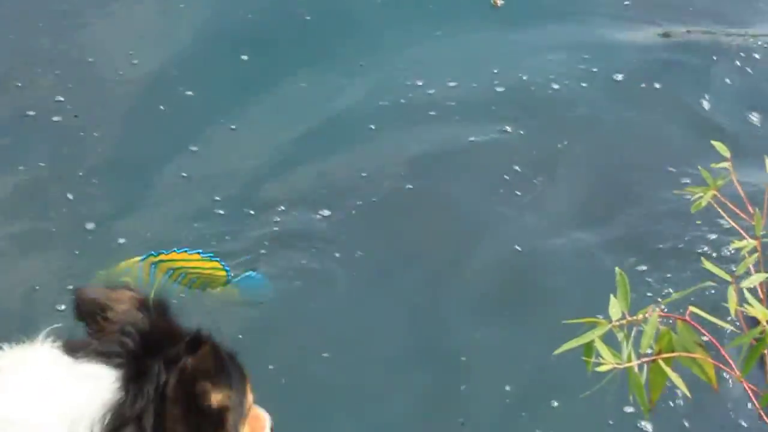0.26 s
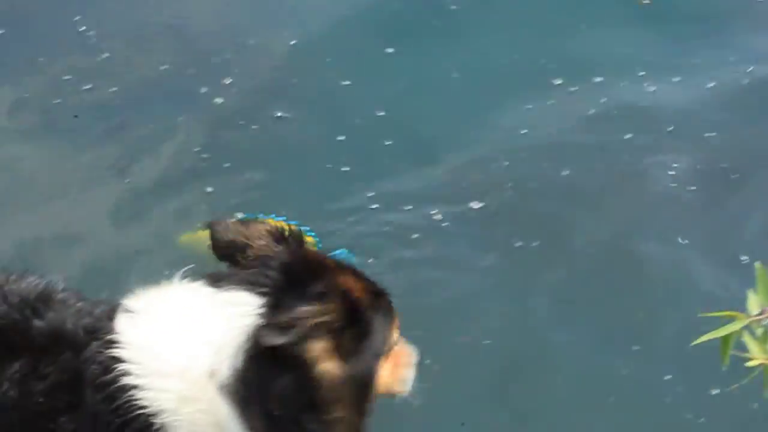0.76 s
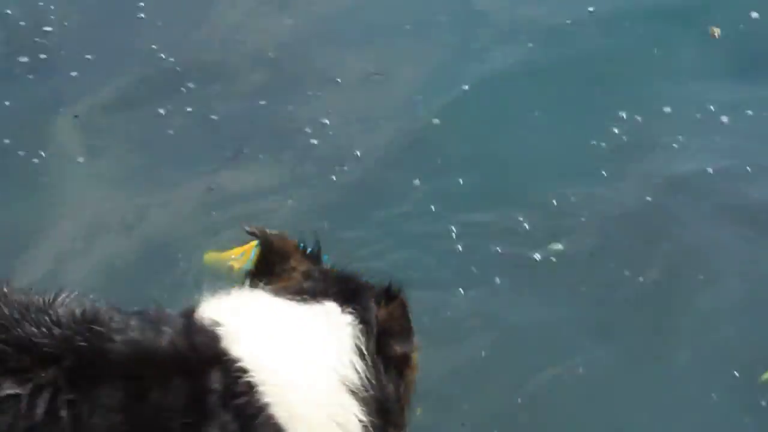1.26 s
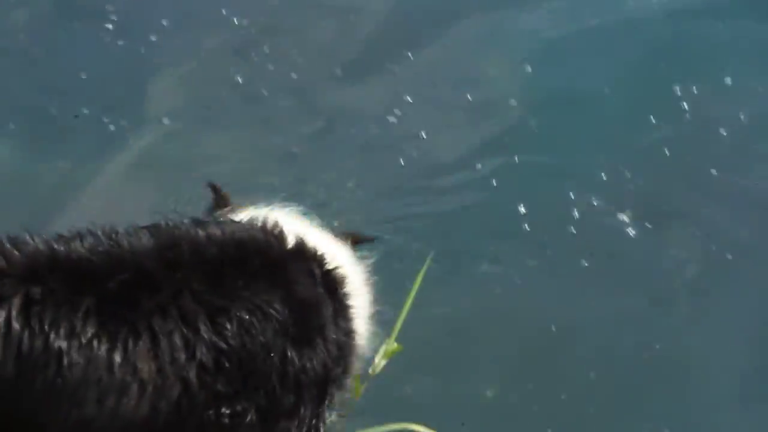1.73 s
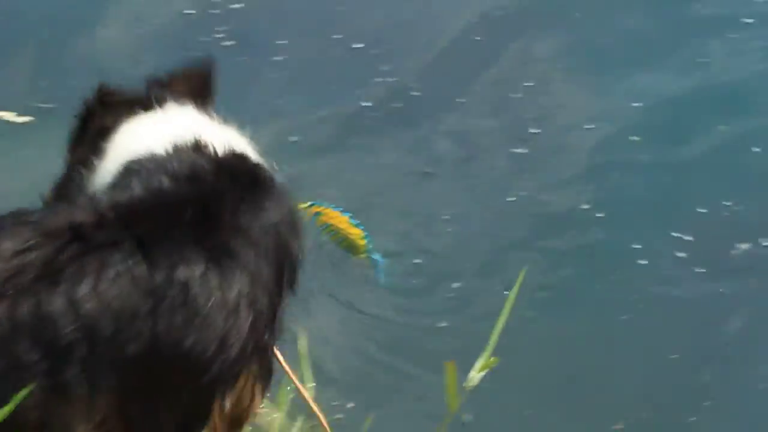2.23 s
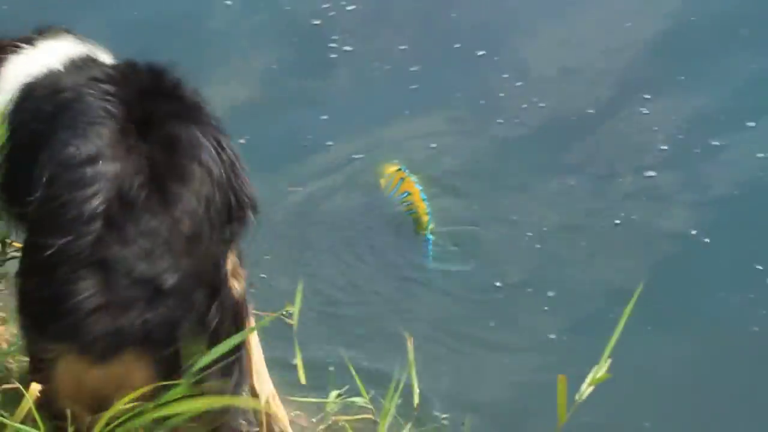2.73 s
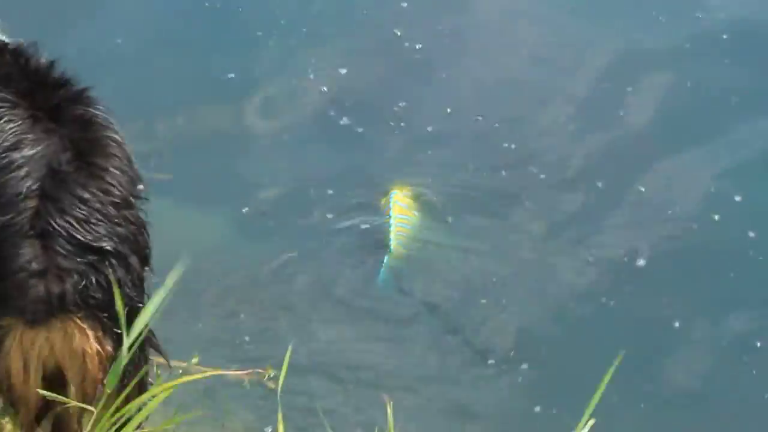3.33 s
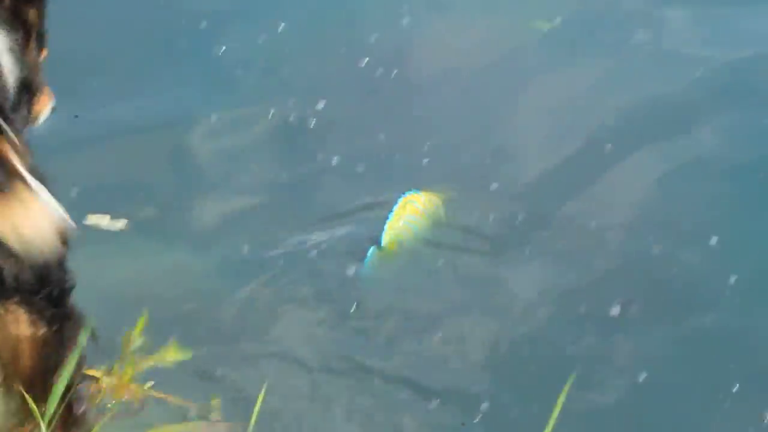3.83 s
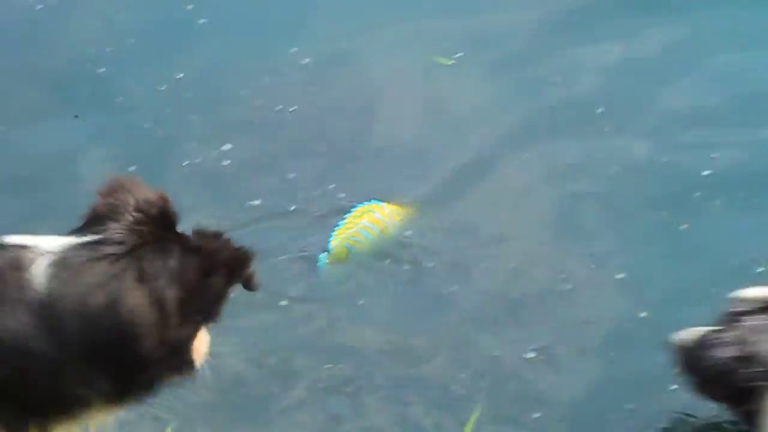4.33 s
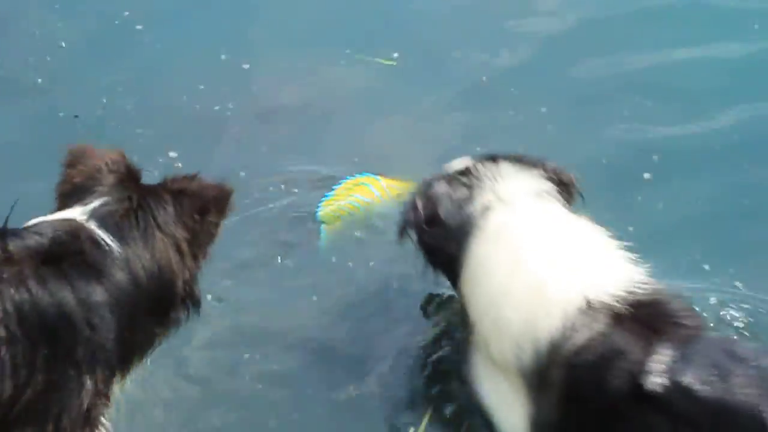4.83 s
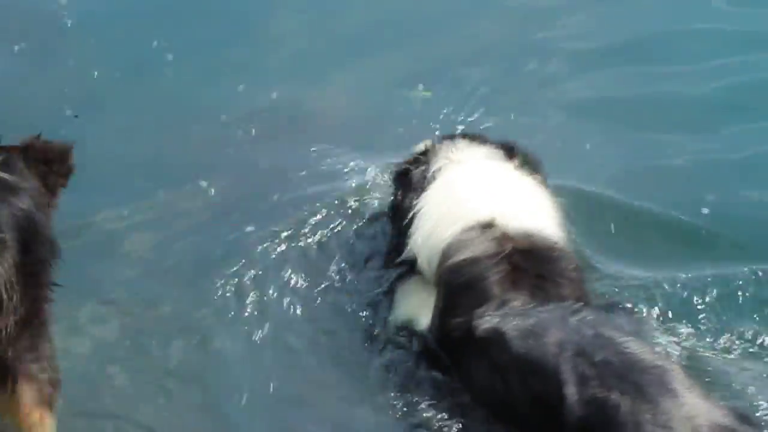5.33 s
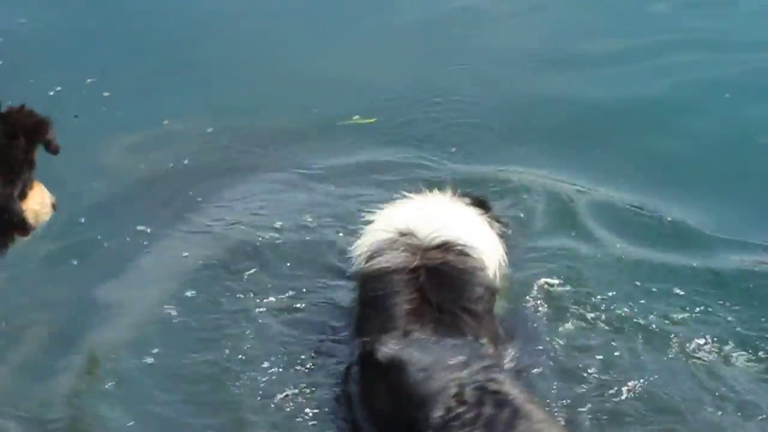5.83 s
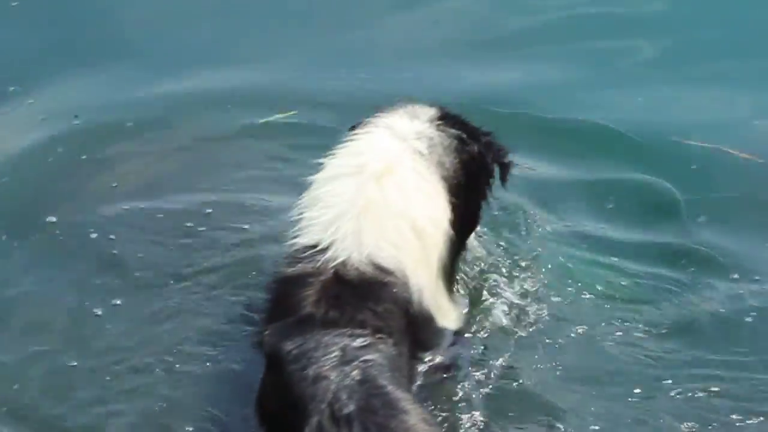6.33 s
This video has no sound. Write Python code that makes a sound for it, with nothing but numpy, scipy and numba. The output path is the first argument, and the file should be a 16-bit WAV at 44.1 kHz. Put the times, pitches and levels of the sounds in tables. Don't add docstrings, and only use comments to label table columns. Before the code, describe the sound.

At a pond bank, dogs stir water a few metres from a handheld camera. Light drips and ticks lead into a growing flurry of slaps, plops and bubbles, thickest around three seconds as wind thumps the microphone hard. It then eases to sparse drips with distant high bird trills, before fresh splashes near four and a half to five seconds and small ones at the end.

```python
import sys
import numpy as np
from scipy import signal
from scipy.fft import rfft, irfft
from scipy.io import wavfile
from scipy.ndimage import uniform_filter1d
from numba import njit

SR = 44100
rng = np.random.default_rng(int(sys.argv[2]) if len(sys.argv) > 2 else 0)


def volts(x):
    e = np.asarray(x, float) / 20
    return 10 ** e


def persist_wave(psi):
    counts = np.round(np.clip(psi, -1, 1) * 32767).astype(np.int16)
    wavfile.write(sys.argv[1], SR, np.atleast_2d(counts).T)


N = 289296
T = np.arange(N) / SR


def band(x, lo_hz, hi_hz, order=2):
    return signal.sosfilt(signal.butter(order, [lo_hz, min(hi_hz, .48 * SR)], "band", fs=SR, output="sos"), x)


def unit(x):
    return x / np.sqrt(np.mean(x ** 2))


def noise(n=N):
    return rng.standard_normal(n)


def walk(rate_hz):
    hold = int(SR / rate_hz)
    steps = np.repeat(noise(N // hold + 1), hold)[:N]
    return unit(uniform_filter1d(uniform_filter1d(steps, hold), hold // 2 + 1))


def add(out, start_s, piece):
    i = max(int(start_s * SR), 0)
    out[i:i + len(piece)] += piece[:N - i]


@njit
def rings(start_s, hz, cycles, glide, size, rise_cycles):
    out = np.zeros(N)
    for k in range(len(start_s)):
        f, phase, a, i = hz[k], 0., size[k], int(start_s[k] * SR)
        while a > .003 * size[k] and i < N and f < .45 * SR:
            out[i] += a * np.sin(phase) * min(phase / (2 * np.pi * rise_cycles), 1.)
            phase += 2 * np.pi * f / SR
            a *= 1 - 6.9 * f / (cycles[k] * SR)
            f *= 1 + glide[k] * f / SR
            i += 1
    return out


def splashes():
    # start_s, peak_db, centre_hz, length_ms
    plops = [(.145, -35.5, 5740, 5.2), (.187, -31, 2400, 5), (0.295, -27, 2460, 7.6),
             (0.566, -29, 2910, 12), (0.642, -27.5, 6160, 3.8), (1.645, -36, 2170, 7.6),
             (1.783, -30, 4780, 10.4), (1.962, -19.5, 1176, 4.3), (2.568, -34, 4030, 9.2),
             (3.866, -33, 3840, 3.4), (4.132, -34, 2220, 9.5), (4.292, -28, 1830, 5.4),
             (4.456, -35, 1860, 12.7), (4.501, -17.5, 3200, 3.1), (4.786, -31, 3470, 10),
             (4.914, -31.5, 1690, 7.1), (5.062, -26.5, 3030, 10.7), (5.377, -28.5, 1460, 5.6),
             (5.976, -21.5, 4600, 4), (6.153, -36, 4200, 28), (6.293, -35, 1790, 4.5)]
    # start_s, peak_db, centre_hz, length_ms
    slaps = [(0.01, -24.5, 4460, 1.8), (0.533, -29, 5600, 2.6), (0.677, -33, 5600, 3.4),
             (1.402, -18.5, 1750, 2.88), (1.421, -32, 5940, 8.5), (1.545, -30, 5040, 2.8),
             (1.687, -22, 1340, 6.6), (1.908, -32.5, 2900, 10.5), (1.941, -24, 3130, 5.5),
             (2.021, -24, 5540, 3.6), (2.178, -23.5, 1680, 3.9), (2.259, -28.5, 3930, 11),
             (2.303, -27.5, 2300, 24), (2.454, -19.5, 2830, 4.3), (2.516, -21, 3540, 9.1),
             (2.759, -29, 3320, 10), (2.819, -18.5, 3040, 2.1), (2.881, -24.5, 920, 14),
             (3.44, -26.5, 4400, 15), (3.61, -36.5, 1120, 24), (4.316, -25.5, 4030, 3.55),
             (4.513, -23.5, 4270, 13), (4.709, -38, 2900, 12.3), (4.98, -25, 2650, 2.9),
             (5.393, -30, 1920, 7.4), (5.403, -32, 4240, 3.5), (5.437, -32.5, 3250, 8.4),
             (5.737, -31, 4000, 3.1), (5.957, -34.5, 3380, 9.1), (6.267, -31.5, 1900, 5.9)]
    # start_s, peak_db, centre_hz, length_ms
    sloshes = [(.161, -32.5, 1800, 5.8), (.267, -28, 4540, 16.7), (0.779, -32, 4460, 19),
               (0.863, -30.5, 3970, 15), (1.061, -28, 5000, 35), (1.319, -29, 3400, 11),
               (1.36, -26.5, 3780, 9.5), (1.713, -20.5, 1950, 10.1), (2.06, -29, 1600, 9.6),
               (2.144, -31.5, 2780, 17), (2.318, -27.5, 4400, 27), (2.436, -23.5, 1100, 20.4),
               (2.654, -23.5, 2060, 5.5), (2.669, -13.5, 1750, 6.1), (2.71, -27.5, 1050, 45),
               (3.29, -29, 1030, 12.4), (4.749, -26.5, 2110, 42.6), (4.829, -32.5, 1780, 13),
               (5.037, -21, 1310, 2.3), (5.22, -27.5, 1970, 5.3), (5.528, -32, 3120, 11),
               (5.56, -28, 1570, 14.1), (5.795, -31, 3540, 6.7), (6.306, -33, 2620, 7.1)]
    # spread_octaves, mist_db
    kinds = [
        (.11, -12),
        (.55, -7.5),
        (.65, -16.5),
    ]
    # start_s, pitch_hz, cycles, glide_per_cycle, level_db
    gulps = [(4.91, 270, 70, .027, -35), (5.035, 900, 45, -.012, -35), (5.105, 560, 60, .003, -42),
             (4.53, 1550, 60, .012, -37), (.29, 1800, 45, .022, -30), (5.264, 790, 45, -.012, -34),
             (5.275, 690, 90, 0, -43), (4.96, 1050, 200, -.003, -42), (6.11, 680, 200, .025, -41),
             (6.055, 320, 110, .027, -40), (2.572, 800, 70, .02, -34), (4.305, 330, 30, .01, -36),
             (3.948, 1500, 70, .014, -42), (4.16, 390, 50, .002, -37), (5.795, 1700, 50, .02, -38),
             (.395, 5800, 1600, -.0003, -50), (1.703, 1120, 45, .006, -26), (2.422, 1250, 60, .005, -26),
             (6.303, 320, 28, 0, -26), (4.409, 215, 26, .03, -18), (3.074, 290, 16, .01, -13),
             (4.474, 300, 22, 0, -29)]
    # start_s, pitch_hz, level_db
    drips = [(1.66, 810, -31), (1.964, 1030, -30), (2.007, 1330, -32), (2.029, 1400, -33),
             (2.679, 970, -24), (2.732, 754, -31), (2.874, 746, -17), (3.042, 1200, -24.5),
             (4.828, 1010, -34), (4.882, 1700, -34), (5.01, 2000, -35), (5.062, 1300, -32),
             (5.16, 1510, -32), (5.218, 850, -29.5), (6.199, 1010, -34.5), (6.246, 905, -37),
             (2.303, 1500, -28), (2.415, 2930, -30), (2.452, 3340, -24.5), (2.543, 1400, -27.5),
             (2.64, 540, -29), (2.65, 1000, -25), (2.665, 1965, -19), (2.836, 1980, -28),
             (2.891, 2990, -24), (2.933, 1230, -26.5), (2.936, 4330, -26), (3.432, 3500, -29),
             (4.362, 1750, -37), (4.452, 1454, -31), (4.548, 840, -32), (4.743, 2820, -25),
             (5.555, 1660, -25.5), (5.39, 1630, -38), (1.642, 2030, -30)]
    drip_t60_s, drip_glide = .033, .005
    length, peak = 4096, 1024
    rows = [(*row, *kind) for table, kind in zip((plops, slaps, sloshes), kinds) for row in table]
    lumps = np.repeat(noise((len(rows), 64)), 64, axis=1)
    ragged = noise((len(rows), length)) * volts(4.5 * lumps)
    scatter = noise((len(rows), 3, 8))
    out, bubbles = np.zeros(N), []
    for (s, peak_db, hz, ms, octaves, mist_db), drops, c in zip(rows, ragged, scatter):
        burst_s = ms / 1000
        u = (np.arange(length) - peak) / SR / burst_s
        shape = np.where(u < 0, np.exp(-(u / 0.5) ** 2), np.exp(-(np.abs(u) / 0.42) ** 0.55))
        fill = np.sqrt(np.mean(shape ** 2))
        wide = 2 ** np.clip(1.55 * octaves, .1, 1.5)
        body = unit(shape * band(drops, hz / wide, hz * wide))
        mist = unit(shape * band(drops, 11500, 12500, order=1))
        add(out, s - peak / SR, volts(peak_db - 6.0) * fill * (body + volts(mist_db - 0.5) * mist))

        many = min(1 + int(ms / 4), 8)
        when, size, loud = c[:, :many] * (np.arange(many) > 0)
        hzs = np.clip(hz * 2 ** (1.19 * octaves * size), 500, 9000)
        starts_s = s + (.4 * when - .3 / many) * burst_s
        cycles = 3.2 * hzs * burst_s / many
        levels_db = peak_db + 1 - 5 * octaves + 2.5 * loud
        bubbles.extend(zip(starts_s, .92 * hzs, cycles, .008 + 0 * hzs, levels_db))
    bubbles.extend(gulps)
    bubbles.extend((s, hz, hz * drip_t60_s, drip_glide, db) for s, hz, db in drips)
    s, hz, cycles, glide, db = np.transpose(bubbles)
    return out + rings(np.maximum(s, 0), hz, cycles, glide, volts(db), 1.6)


def flecks():
    # start_s, peak_db, pitch_hz
    drops = [(0.388, -35, 1170), (0.619, -28, 6550.0), (0.687, -26, 6420.0), (0.78, -25, 6800.0),
             (0.975, -15.5, 6420.0), (.985, -18, 9500), (1.06, -24, 9500), (1.143, -28, 9000.0),
             (1.194, -22.5, 3270.0), (1.419, -19.5, 6840), (1.58, -26, 3010.0), (1.542, -25, 9500),
             (1.784, -18.5, 4700), (2.016, -17, 9200), (2.294, -20, 9500), (2.348, -25, 3100.0),
             (2.434, -15.5, 1260), (2.57, -21, 4050.0), (2.755, -18, 3250), (2.819, -18, 2520),
             (2.854, -20, 8550), (3.007, -18, 4260.0), (3.134, -18.5, 4670), (3.171, -26, 2470),
             (3.293, -18.5, 4870), (3.392, -27, 12360.0), (4.513, -23, 9000), (4.818, -28, 1500),
             (4.929, -27, 3620.0), (4.979, -24, 9600), (4.992, -23.5, 3880.0), (5.968, -22, 4800),
             (6.079, -26.5, 4350.0), (6.26, -27.5, 5000.0), (6.295, -23.5, 1810.0)]
    lead_s, decay_s, ring_cycles, ring_db, spit_db = .0005, 0.0015, 10.4, 5, -11.5
    s, db, hz = np.transpose(drops)
    out = rings(s - lead_s, hz, ring_cycles + 0 * s, 0.012 + 0 * s, volts(db + ring_db), 0.72)
    fade = np.exp(-T[:512] / decay_s)
    for start_s, peak_db, f, spit in zip(s, db, hz, noise((len(s), 512))):
        spit = unit(band(spit, f / 3.5, 14000, order=1))
        add(out, start_s - lead_s, volts(peak_db + spit_db) * fade * spit)
    return out


def grains(count, lo_hz, hi_hz, cycles, glide, spread_db):
    when, size, rare, length, bend = rng.random((count, 5)).T
    loud = np.minimum(-np.log(1 - rare), 2.3)
    hz = lo_hz * (hi_hz / lo_hz) ** size
    cycles = cycles * (0.18 + 1.4 * length)
    return unit(rings(when * N / SR, hz, cycles, glide * (2 * bend - .4), volts(spread_db * loud), 0.93))


def crackle():
    rate_per_s, level_db, spread_db, decay_s = 90, -4, 4.5, 0.001
    when, rare = rng.random((int(rate_per_s * N / SR), 2)).T
    hits = np.zeros(N)
    hits[(when * N).astype(int)] = volts(level_db + spread_db * np.minimum(-np.log(1 - rare), 3))
    return 1 + signal.lfilter([1], [1, -np.exp(-1 / (decay_s * SR))], hits)


def sheets():
    # start_s, length_ms, mist_db, fizz_over_mist_db
    throws = [(0.002, 16, -44, -9), (0.67, 48, -46, -12), (0.733, 42, -45, -13), (0.861, 25, -41, 0),
              (0.888, 120, -41.5, 8.5), (1.039, 47, -43, 2), (1.351, 19, -40, 4), (1.389, 19, -38, 0),
              (1.445, 44, -38, -9), (1.534, 31, -38, -15), (1.669, 20, -42.5, 13.5), (1.709, 12, -55, 12),
              (1.889, 57, -41, -18), (2.056, 29, -42, 6.5), (2.253, 23, -39, 4), (2.289, 41, -43, 8),
              (2.414, 31, -44, 16), (2.492, 39, -41, 12), (2.651, 26, -40.5, 13.5), (2.737, 40, -47, 5),
              (2.847, 41, -38, 9.5), (2.886, 80, -41.5, 11.5), (3.169, 19, -37, 7.5),
              (3.289, 22, -47.5, 13), (3.386, 130, -41.5, 8), (4.697, 26, -43, -2), (4.738, 12, -55, 18),
              (4.927, 29, -44.5, 4), (5.214, 26, -45, 10.5), (5.39, 15, -34.5, 0), (5.545, 31, -41, 2),
              (6.136, 35, -52, 15)]
    rise_s, fall_s, mist_db, fizz_db = 0.0026, 0.0035, -5.5, -9
    mist, fizz = np.zeros((2, N))
    for s, ms, db, over_db in throws:
        opening = (T - s) / rise_s + 1
        closing = (s + ms / 1000 - T) / fall_s + 1
        gate = np.clip(np.minimum(opening, closing), 0, 1)
        mist += volts(db + mist_db) * gate
        fizz += volts(db + over_db + fizz_db) * gate
    return volts(1.3 * walk(140)) * [mist, fizz]


def spray():
    # start_s, level_db, drop_fineness_db
    water = [(0.0, -50, 0), (0.6, -48, 2.5), (0.88, -42.5, 2), (1.0, -33.5, 3.5), (1.08, -39, 5.5),
             (1.57, -38.5, 5), (1.8, -46, 2.5), (2.39, -38.5, 0.5), (2.74, -36, -2.5), (2.9, -32, -1),
             (3.09, -31, -2), (3.45, -42, 2.5), (3.6, -43, 3.5), (4.02, -44.5, 1), (4.75, -44, -1),
             (5.06, -38.5, -3), (5.3, -46, 0), (6.56, -48, 1)]
    # freq_hz, density_db_per_hz
    spectrum = [
        (290, -30),
        (500, -2),
        (1260, 1),
        (3500, 1),
        (5300, -2),
        (7200, -10),
        (10200, -16),
        (13800, -7),
        (15700, -14),
        (16500, -30),
    ]
    far_db, air_db, air_from_s = -55, -60.5, 3.1
    s, level_db, fineness_db = np.transpose(water)
    mid_db, fine_db = np.interp(T, s, level_db), np.interp(T, s, fineness_db)
    low_db = 0.73 * mid_db - 15.5 - fine_db
    top_db = 0.63 * mid_db - 26 + fine_db

    patter = volts(2.0 * walk(30) + 1.0 * walk(130)) * crackle()
    f = np.maximum(np.fft.rfftfreq(N, 1 / SR), 1)
    hz, db = np.transpose(spectrum)
    tilt = volts(np.interp(np.log(f), np.log(hz), db))
    far = irfft(rfft(noise()) * tilt, N)
    hiss = irfft(rfft(noise() * patter) * tilt, N)

    slosh = .8 * unit(band(hiss, 450, 2000, order=3))
    slosh += .75 * grains(count=1500, lo_hz=700, hi_hz=2450, cycles=24., glide=.012, spread_db=3.5)
    fizz = unit(band(hiss, 1770, 8300, order=3))
    fizz += 0.73 * grains(count=2000, lo_hz=2580, hi_hz=6330, cycles=50.0, glide=0.0093, spread_db=0.5)
    mist = unit(band(noise() * patter, 7800, 13800, order=1))
    mist += .35 * grains(count=3000, lo_hz=7000, hi_hz=14000, cycles=10., glide=0., spread_db=4.5)

    thrown_mist, thrown_fizz = sheets()
    out = volts(low_db - 4.0 + 0.2 * walk(8.4)) * slosh
    out += np.hypot(volts(mid_db - 7.5 + 0.5 * walk(17)), thrown_fizz) * fizz
    out += np.hypot(volts(top_db - 2.0 + 0.29 * walk(33)), thrown_mist) * mist
    air = np.clip(2 * (T - air_from_s), 0, 1) * unit(band(far, 12100, 15200))
    return volts(far_db) * unit(far) + out + volts(air_db) * air


def wind():
    # start_s, strength_db, sharpness_db
    gusts = [(0.0, -46, 3), (.14, -56.5, 6.5), (1.95, -51.5, 1), (2.21, -36.5, -12), (2.36, -46.5, 2.5),
             (2.83, -37.5, 2), (3.09, -22.5, 6), (3.31, -31, -4), (3.43, -64, 8), (3.761, -28, 5.5),
             (3.86, -56, 1.5), (4.35, -37, 7.5), (4.55, -43, 9.5), (4.69, -41.5, -14), (4.93, -42.5, 5),
             (5.72, -69.5, 14), (5.94, -43, 4.5), (6.5, -41, 1)]
    # start_s, peak_db, pitch_hz
    thumps = [(0.48, -16.5, 144), (1.594, -20.5, 138), (1.859, -21, 160), (1.95, -21.5, 118),
              (2.783, -22, 150), (2.846, -22.5, 123), (2.882, -17.5, 115), (2.916, -20, 158),
              (2.988, -16.5, 151), (3.006, -14.5, 220), (3.021, -22, 105), (3.037, -21, 109),
              (3.075, -12, 169), (3.117, -11.5, 201), (3.126, -8.5, 187), (3.152, -19, 195),
              (3.169, -14.5, 119), (3.184, -14, 185), (3.202, -7, 209), (3.214, -13.5, 256),
              (3.225, -13.5, 200), (3.248, -16, 141), (3.273, -16.5, 123), (3.35, -17, 142),
              (3.675, -15.5, 200), (3.699, -17.5, 127), (3.739, -26, 135), (3.755, -11.5, 146),
              (3.793, -16, 145), (4.252, -22, 167), (4.276, -16, 193), (4.408, -16.5, 114),
              (4.437, -14, 203), (5.998, -18, 169), (6.432, -18.5, 197)]
    # start_s, peak_db
    bumps = [(0.27, -28.5), (0.469, -23.5), (0.899, -28), (1.87, -22), (2.075, -29.5), (2.138, -28.5),
             (2.151, -23.5), (2.173, -26.5), (2.23, -25.5), (2.26, -29), (2.403, -29), (2.444, -25),
             (2.502, -24.5), (2.524, -30), (2.626, -28.5), (2.643, -24.5), (2.721, -25.5), (2.827, -24),
             (2.856, -42), (2.963, -32), (3.288, -22), (3.306, -27), (3.321, -33), (3.334, -25),
             (3.401, -24), (3.428, -24), (3.446, -29), (3.524, -23.5), (3.664, -26.5), (3.715, -30),
             (4.073, -25.5), (4.347, -31), (4.374, -29), (4.385, -25), (4.464, -26), (4.495, -26.5),
             (4.509, -27), (4.636, -27), (4.78, -25.5), (4.8, -24), (4.812, -29), (4.837, -27),
             (5.289, -31.5), (5.949, -24.5), (5.968, -32), (6.044, -31), (6.104, -24.5), (6.19, -30),
             (6.213, -29.5), (6.331, -34), (6.343, -28.5), (6.373, -25.5), (6.402, -30), (6.47, -28),
             (6.499, -29)]
    # start_s, peak_db
    puffs = [(.028, -35), (0.047, -43), (0.395, -36), (0.416, -37), (0.508, -31), (0.53, -36.5),
             (0.719, -39), (1.68, -34), (3.985, -35), (4.115, -42), (4.19, -36), (5.09, -33.5)]
    # start_s, peak_db
    flicks = [(1.402, -28.5), (2.675, -21), (2.756, -26.5), (2.934, -29), (3.052, -23), (4.219, -27),
              (4.297, -26.5), (4.665, -31), (4.737, -30), (4.752, -23), (4.769, -26.5), (4.873, -27.5),
              (4.913, -32), (5.014, -36), (5.037, -28.5), (5.318, -30.5), (5.935, -27), (6.308, -26),
              (6.519, -29.5)]
    bump_hz, flick_hz, scatter = 115, 224, 0.17
    snap_over_db, snap_ratio, snap_cycles = -12, 1.67, 0.28
    push_s, push_slope, push_db = .04, 0.39, -25
    s, low_db, sharp_db = np.transpose(gusts)
    gust_db = np.interp(T, s, low_db)
    snap_db = np.interp(T, s, sharp_db) + snap_over_db
    flutter_db = np.interp(T, s, 0.46 * low_db - 31 + sharp_db)

    lumps = np.minimum(walk(35), 1.2)
    eddies = unit(band(noise() * volts(7 * lumps), 47.0, 182))
    sway = unit(band(noise() * volts(2.5 * walk(10)), 25, 80))
    flutter = unit(band(noise() * volts(2.0 * lumps + 3.7 * walk(90)), 210, 513, order=3))
    out = volts(gust_db) * eddies + volts(0.32 * gust_db - 35) * sway + volts(flutter_db - 5.0) * flutter

    rows = list(thumps)
    for table, mean_hz in ((bumps, bump_hz), (puffs, bump_hz), (flicks, flick_hz)):
        rows += [(s, db, mean_hz * (1 + scatter * c)) for (s, db), c in zip(table, noise(len(table)))]
    half = np.linspace(-np.pi, np.pi, int(push_s * SR))
    push = np.cos(half / 2) ** 2 * np.cos(2 * half)
    for (s, peak_db, hz), turn in zip(rows, rng.random(len(rows))):
        u = np.arange(-2, 2, hz / SR)
        swing = np.exp(-(u / .58) ** 2) * np.cos(2 * np.pi * (u + .3 * (turn - .5)))
        snap = np.exp(-(u / snap_cycles) ** 2) * np.cos(2 * np.pi * (snap_ratio * u + turn - .5))
        snap_gain = volts(min(snap_db[int(s * SR)], -3))
        add(out, s - 2 / hz, volts(peak_db) * (swing + snap_gain * snap))
        add(out, s - push_s / 2, volts(push_slope * peak_db + push_db) * np.sign(turn - .5) * push)
    return out


def ticks():
    # start_s, peak_db
    pushes = [
        (0.889, -5.5),
        (0.914, -9),
        (0.951, -7),
        (1.161, -5.5),
        (2.894, -4.5),
        (3.256, -5.5),
    ]
    # pitch_hz, level_db, t60_s, swell_cycles
    modes = [
        (1100, -11, 0.021, 1.1),
        (1284, 6.5, 0.0056, 0.77),
        (1385, -15, 0.051, 1.1),
        (2300, 3.5, 0.013, 4.7),
        (3700, 1, 0.0031, 1.8),
        (5370, -10, 0.0061, 1.6),
    ]
    crack_db, crack_s = -23.5, 0.0021
    s, peak_db = np.transpose(pushes)
    out = np.zeros(N)
    for hz, db, t60_s, swell_cycles in modes:
        size = volts(peak_db + db - 7.0)
        out += rings(s, hz + 0 * s, hz * t60_s + 0 * s, 0 * s, size, 1. * swell_cycles)
    for start_s, db in pushes:
        crack = np.exp(-T[:400] / crack_s) * band(noise(400), 6000, 17000)
        add(out, start_s, volts(db + crack_db) * crack)
    return band(out, 850, 20000, order=4)


def trill(table, drop_hz, hold_s, fall_s):
    starts_s, notes, tops_hz, levels_db = np.transpose(table)
    notes = np.round(notes)
    u = np.arange(int((hold_s + fall_s) * SR)) / SR
    slide_hz = drop_hz * np.where(u < hold_s, .15 * (1 - u / hold_s), (u - hold_s) / fall_s)
    shape = np.sin(np.pi * (u / u[-1]) ** .85) ** .8
    out = np.zeros(N)
    for note in range(int(notes[-1]) + 1):
        s, hz, db = (np.interp(note, notes, column) for column in (starts_s, tops_hz, levels_db))
        whistle = np.sin(2 * np.pi * np.cumsum(hz - slide_hz) / SR)
        add(out, s - .003, volts(db - 2 + 1.5 * rng.standard_normal()) * shape * whistle)
    return out


def birds():
    # start_s, note_number, top_hz, level_db
    early = [
        (1.625, 0, 7600, -51),
        (2.58, 17, 7600, -48),
        (2.8, 21, 7600, -49),
    ]
    near = [
        (3.527, 0, 7390, -48),
        (3.754, 4, 7580, -45),
        (4.453, 17, 7600, -47),
        (4.723, 22, 7600, -47),
        (5.671, 39, 7600, -46),
    ]
    far = [
        (3.688, 0, 6950, -56),
        (5.025, 22, 7010, -54),
        (5.735, 34, 7030, -50),
        (6.527, 47, 7000, -52),
    ]
    return trill(early, 600, .012, .008) + trill(near, 900, .011, .009) + trill(far, 450, .009, .007)


def motor():
    # shaft_multiple, start_s, end_s, level_db
    partials = [
        (35, 5.4, 6.6, -65.5),
        (37, 5.1, 6.0, -63),
        (39, 5.2, 5.65, -63),
        (39, 6.3, 6.6, -67.5),
        (42, 5.0, 5.6, -64),
        (28, 6.3, 6.45, -66),
    ]
    shaft_hz, rise_hz_per_s, from_s = 211.25, .22, 5.2
    phase = 2 * np.pi * np.cumsum(shaft_hz + rise_hz_per_s * (T - from_s) + 0.155 * walk(4)) / SR
    out = np.zeros(N)
    for multiple, start_s, end_s, db in partials:
        fade = np.clip(np.minimum(T - start_s, end_s - T) / .06, 0, 1)
        out += volts(db + 2.5 * walk(7)) * fade * np.sin(multiple * phase)
    return out


def scene():
    return (splashes() + flecks() + spray() + wind() + ticks() + birds() + motor())[None]


def top_cut(x):
    return signal.sosfilt(signal.butter(12, 17040, fs=SR, output="sos"), x)


def record(dry):
    dry = signal.sosfilt(signal.ellip(8, .2, 45, 15900, fs=SR, output="sos"), dry)
    dry = signal.sosfilt(signal.butter(2, 45, "high", fs=SR, output="sos"), dry)
    return top_cut(dry)


dry = scene()
out = record(dry)
persist_wave(out)
```